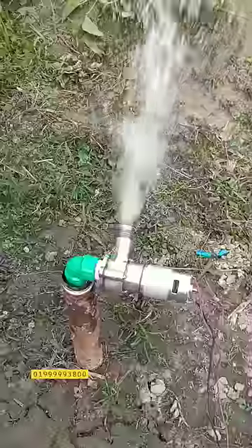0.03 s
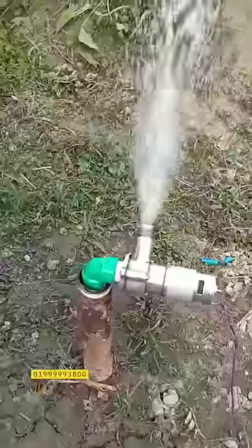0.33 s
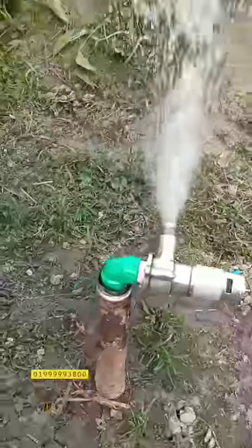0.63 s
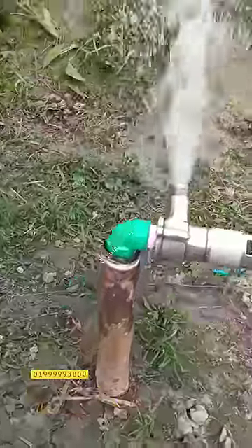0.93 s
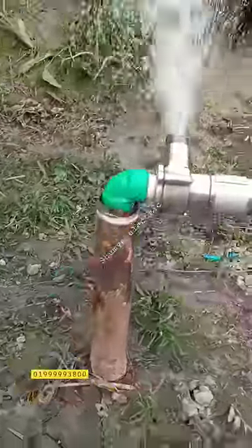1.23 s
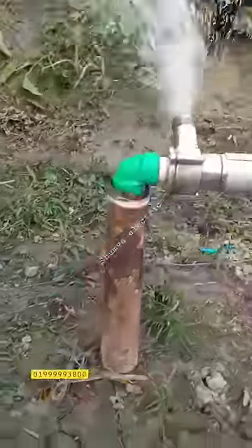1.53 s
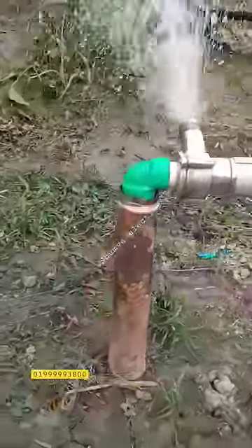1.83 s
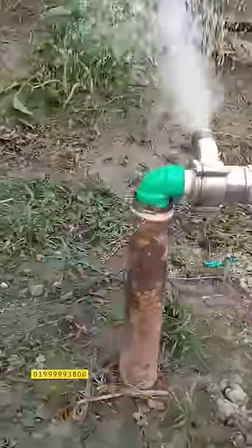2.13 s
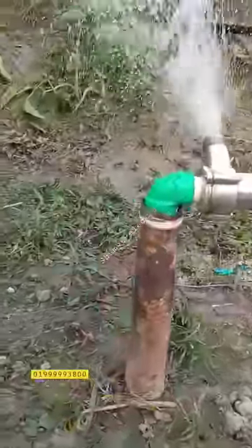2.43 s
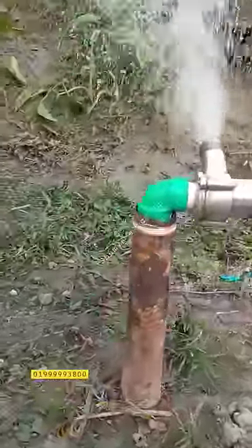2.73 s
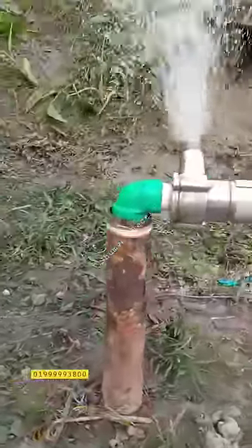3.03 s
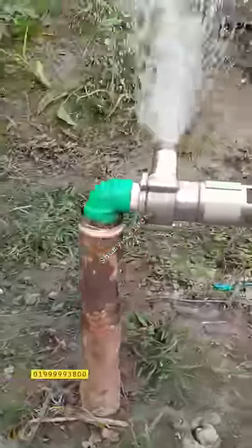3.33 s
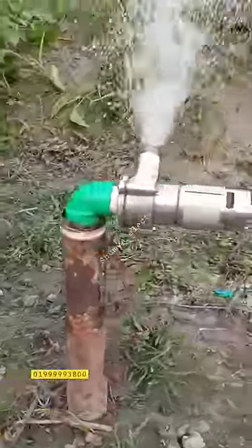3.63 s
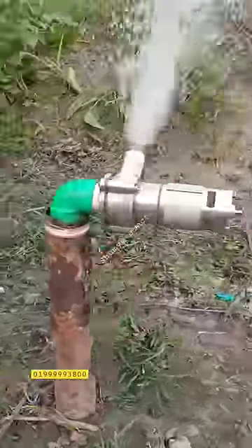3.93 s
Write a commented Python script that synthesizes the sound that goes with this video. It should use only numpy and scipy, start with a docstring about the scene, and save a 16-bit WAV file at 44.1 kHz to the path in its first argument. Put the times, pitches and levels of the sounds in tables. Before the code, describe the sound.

A jet of water hisses from a pipe, surging and spitting drops over a low watery rush. An electric pump hums throughout with a wavering pitch and a thin buzz, about a metre away on open ground.

```python
"""Water pump and jet

A pump runs on open ground and drives a jet out of a pipe stub, about a metre from the microphone.
The motor hums in sharp pulses whose pitch wavers quickly, with a thin steady buzz on top. The jet
hisses, surges and spits as it tears into drops, over a low rush of water. A watery warble, like
compressed audio, lies over the hiss. The sound fades in, and a puff of wind hits the left side."""
import sys
import numpy as np
from scipy import signal
from scipy.fft import rfft, irfft
from scipy.io import wavfile
from scipy.ndimage import uniform_filter1d, map_coordinates

SR = 44100
rng = np.random.default_rng(int(sys.argv[2]) if len(sys.argv) > 2 else 0)


def pcm_store(signal):
    """Save signal as 16-bit PCM."""
    levels = np.round(np.clip(np.atleast_2d(signal), -1, 1) * 32767)
    wavfile.write(sys.argv[1], SR, levels.astype(np.int16).T)


N = 176400
T = np.arange(N) / SR
FREQS = np.maximum(np.arange(N // 2 + 1) * SR / N, 1)

# how fast the motor pulses: t/s, rate/Hz
MOTOR_SPEED = [(.9, 141.9), (3.2, 141.65), (3.9, 141.45)]


def undb(db):
    """Turn decibels into a factor to multiply by."""
    return 10 ** (np.asarray(db) / 20)


def unit(x):
    """Scale a signal to an average size (rms) of 1."""
    return x / np.sqrt(np.mean(x ** 2))


def curve(rows):
    """Join the rows of a timed table with straight lines."""
    times, *columns = np.array(rows, float).T
    return np.squeeze([np.interp(T, times, column) for column in columns])


def response(points):
    """Draw a gain for every frequency through (f/Hz, level/dB) points."""
    hz, db = np.array(points, float).T
    return undb(np.interp(np.log(FREQS), np.log(hz), db))


def shape(x, gain):
    """Turn each frequency up or down by its gain."""
    return irfft(rfft(x) * gain, N)


def noise():
    """White noise, unrelated left and right."""
    return rng.standard_normal((2, N))


def wander(rate_hz):
    """A smooth random wobble of size 1; a higher rate makes it quicker."""
    times = T[::40]
    hz = np.arange(len(times) // 2 + 1) * SR / N
    spectrum = rfft(rng.standard_normal(len(times))) / np.sqrt(1 + (2 * hz / rate_hz) ** 4)
    return np.interp(T, times, unit(irfft(spectrum, len(times))))


def spread(pair, likeness):
    """Blend two noises into left and right: likeness 1 is the same, 0 unrelated, -1 opposite."""
    mid = shape(pair[0], np.sqrt((1 + likeness) / 2))
    side = shape(pair[1], np.sqrt((1 - likeness) / 2))
    return np.array([mid + side, mid - side])


def add(out, sound, at):
    """Mix in a short sound with its middle at the given second."""
    index = int(at * SR) - sound.shape[1] // 2 + np.arange(sound.shape[1])
    inside = (index >= 0) & (index < N)
    out[:, index[inside]] += sound[:, inside]


def motor_hum(cycles, waver_hz=15.6, right_lag_s=0.00012):
    """Harmonics (tones at multiples of the motor rate) line up into one sharp pulse per cycle."""
    # how far the pitch wavers: t/s, swing/Hz
    swing = [(.55, 4), (1.05, 0.58), (1.4, 2.7), (2.1, 4.5), (2.7, 1.7), (3.25, 4.6), (3.9, 6.4)]
    # the main tones: t/s, then relative level/dB of harmonics 1, 3, 4, 5, 6
    main_levels = [(.5, -45, -45.5, -40, -59, -50), (1.1, -41, -40.5, -37.5, -41.5, -51.5),
                   (1.45, -37, -42.5, -39.5, -35, -43.5), (2.05, -40.5, -38.5, -41, -41.5, -38.5),
                   (2.7, -39.5, -36, -37.5, -39, -37), (3.3, -38.5, -39, -36.5, -41.5, -38.5),
                   (3.9, -37, -40, -36, -44.5, -38)]
    # weak tones that follow harmonic 1: harmonic, level/dB relative to it
    weak_tones = [(2, -10), (7, -10.5), (8, -17.5), (9, -14), (10, -14.5)]
    waver = curve(swing) * np.sin(2 * np.pi * np.cumsum(waver_hz + 0.48 * wander(1.3)) / SR)
    lag = np.array([[0], [right_lag_s]]) * curve(MOTOR_SPEED)
    phase = cycles + np.cumsum(waver) / SR - lag
    levels = curve(main_levels)
    tones = list(zip((1, 3, 4, 5, 6), levels))
    tones += [(harmonic, levels[0] + db) for harmonic, db in weak_tones]
    pan_db = np.array([[-0.18], [0.18]])  # higher tones lean further right
    hum = sum(undb(db + harmonic * pan_db) * np.cos(2 * np.pi * harmonic * phase)
              for harmonic, db in tones)
    return np.sqrt(2) * hum * undb(-2 + wander(80))


def casing_buzz(cycles, flutter_db=2.5):
    """The casing buzzes at high multiples of the motor rate, each fluttering on its own."""
    # tones of the casing: harmonic, relative level/dB
    tones = [(9, -8), (10, -8), (20, -5), (23, -2), (25, 2), (28, -2), (29, -4), (30, 3), (39, -1),
             (41, 3.5), (42, -1)]
    buzz = 0
    for harmonic, db in tones:
        gain = undb(db + flutter_db * wander(11))
        buzz = buzz + gain * np.cos(2 * np.pi * (harmonic * cycles + rng.random((2, 1))))
    return buzz * undb(-45.5)


def motor_rasp(cycles, centre_hz=1910, width_octaves=0.82, sharpness=3.5):
    """A short scrape of noise comes once in every motor cycle."""
    octaves = np.log2(FREQS / centre_hz)
    scrape = shape(noise(), 1 / np.sqrt(1 + (octaves / width_octaves) ** 4))
    pulses = np.exp(sharpness * np.cos(2 * np.pi * cycles))
    return unit(scrape * pulses) * undb(-46)


def jet(drops_per_s=5000, drop_share=0.11, surge_db=1.11):
    """The jet hisses and tears into tiny ticking drops; the whole spray surges."""
    # tone colour of the hiss: f/Hz, relative level/dB
    colour = [(650, -34), (1350, -9.5), (1750, -9), (3110, -5.5), (3700, 0), (4740, -3), (5720, 1.5),
              (7140, -8), (8160, -16), (11000, -17), (14000, -19), (15500, -23)]
    # how alike the jet is left and right: f/Hz, likeness
    alike = [(1600, 0.12), (2500, -.21), (3500, 0.4), (5000, -.25), (6500, .2), (11000, -0.12)]
    ticks = (rng.random((2, N)) < drops_per_s / SR) * np.sign(noise())
    drops = ticks * undb(2 * np.minimum(rng.exponential(size=(2, N)), 5))
    spray = np.sqrt(1 - drop_share) * noise() + np.sqrt(drop_share) * unit(drops)
    spray = spread(spray, np.interp(FREQS, *np.array(alike).T))
    bass_cut = 1 / np.sqrt(1 + (1100 / FREQS) ** 8)
    spray = compression_warble(shape(spray, response(colour) * bass_cut))
    pan = undb([[-0.025], [0.025]])
    return pan * unit(spray) * undb(-28.5 + surge_db * wander(24))


def compression_warble(hiss, rate_hz=45):
    """A watery warble, like compressed audio, is laid over the hiss as bands flicker at random."""
    frames = dict(fs=SR, nperseg=512, noverlap=384)
    hz, times, cells = signal.stft(hiss, **frames)  # a grid of frequency by time
    db = 0
    for depth_db, width_hz in ((0.46, 1486), (4.5, 170)):  # wide bands gently, narrow ones strongly
        wobble = rng.standard_normal(cells.shape[1:])
        wobble = uniform_filter1d(wobble, round(width_hz / hz[1]), axis=0)
        wobble = uniform_filter1d(wobble, round(1 / rate_hz / times[1]), axis=1)
        db = db + depth_db * np.minimum(unit(wobble), 1.3)
    return signal.istft(cells * undb(db), **frames)[1][:, :N]


def echoes(spray, sway_hz=1.17):
    """Echoes off pipe and ground drift as the microphone sways, slowly recolouring the spray."""
    # the echoes: delay/s, typical drift/s, level/dB relative to the direct sound
    bounces = [(.0014, 0.000088, -12.5), (.0052, .00012, -2.5)]
    out, power = spray, 1
    for delay, drift, db in bounces:
        late = [map_coordinates(side, [(T - delay - drift * wander(sway_hz)) * SR], mode="mirror")
                for side in spray]
        out = out + undb(db) * np.array(late)
        power += undb(db) ** 2
    return out / np.sqrt(power)


def water_rush(wide_above_hz=1020, churn_db=2.5):
    """Water churns in the pipe and lands; its bass is alike on both sides."""
    # tone colour of the rush: f/Hz, relative level/dB
    colour = [(70, -5.5), (120, -4.5), (200, -1), (350, -0.5), (700, 0.5), (1100, 3), (1600, -5),
              (2500, -27.5)]
    water = spread(noise(), 1 / (1 + (FREQS / wide_above_hz) ** 4))
    return unit(shape(water, response(colour))) * undb(-41 + churn_db * wander(29))


def splash(hz, spread_s, bubbles=12, spread_octaves=0.2354, decay_cycles=19.6):
    """A cluster of bubbles rings briefly around one pitch; its loudest moment has size 1."""
    t = np.arange(-2048, 2048) / SR
    pitch, when = np.clip(rng.standard_normal((2, bubbles, 1, 1)), -2, 2)
    cycles = np.maximum(t - spread_s * when, 0) * hz * 2 ** (spread_octaves * pitch)
    envelope = (1 - np.exp(-cycles)) * np.exp(-cycles / decay_cycles)
    rings = envelope * np.sin(2 * np.pi * (cycles + rng.random((bubbles, 2, 1))))
    cluster = rings.sum(axis=0)
    power = uniform_filter1d(np.mean(cluster ** 2, axis=0), size=130)
    return cluster / np.sqrt(power.max())


def spits(small_count=300):
    """Pockets of air burst from the nozzle: a few loud splashes over a constant sputter."""
    # the single spits: t/s, relative level/dB, centre f/Hz, spread in time/s
    bursts = [(0.428, -20, 4090, 0.0061), (0.668, -24, 4290, 0.0062), (.727, -26, 5200, .006),
              (.812, -24, 4490, 0.0036), (.837, -22, 4400, 0.0021), (1.189, -24.5, 4210, 0.01),
              (1.238, -22, 4210, 0.0052), (1.33, -21, 4190, 0.0031), (1.364, -23, 4500, .001),
              (1.782, -19.5, 4800, 0.0012), (1.796, -24.5, 4500, 0.0027), (2.187, -32, 3250, 0.00103),
              (2.333, -25, 3680, .007), (2.882, -25.5, 4140, 0.0029), (3.3883, -16, 4390, 0.00032),
              (3.39, -24.5, 2920, .001), (3.829, -35, 3970, .001), (3.989, -26, 4660, 0.0066)]
    out = np.zeros((2, N))
    for at, db, hz, spread_s in bursts:
        add(out, splash(hz, spread_s) * undb(db - 0.5), at)
    scatter = np.clip(rng.standard_normal((small_count, 2)), -2, 2)
    times = rng.random(small_count) * N / SR
    for at, (pitch, size) in zip(times, scatter):
        small = splash(hz=4710 * 2 ** (0.216 * pitch), spread_s=0.002, bubbles=3)
        add(out, small * undb(-33 + 2 * size), at)
    return out


def wind(puff_at_s=0.5866, puff_hz=26.6, rise_s=0.00033, decay_s=0.015, tick_hz=2100, gust_db=7):
    """One puff ticks and rocks the microphone's left membrane, amid faint buffeting."""
    # tone colour of the buffeting: f/Hz, relative level/dB
    colour = [(15, 10), (35, -22), (70, -5), (150, -47), (400, -46)]
    # strength of the buffeting before gusts are added: t/s, level/dB
    strength = [(.5, -72), (.66, -48), (.9, -59), (1.3, -72), (3.2, -79), (3.9, -56)]
    rumble = unit(shape(noise(), response(colour)))
    left, right = rumble * undb(curve(strength) + gust_db * wander(17))
    age = np.maximum(T - puff_at_s, 0)
    envelope = (1 - np.exp(-(age / rise_s) ** 2)) * np.exp(-age / decay_s)
    puff = -0.4 * envelope * np.cos(2 * np.pi * puff_hz * age)
    tick = 2 * undb(-24) * np.exp(-age / 0.001) * np.sin(2 * np.pi * tick_hz * age)
    return np.array([left + puff + tick, right * undb(-27)])


def scene():
    """Motor, water and wind in the open air."""
    cycles = np.cumsum(curve(MOTOR_SPEED)) / SR  # motor pulses counted so far
    motor = motor_hum(cycles) + casing_buzz(cycles) + motor_rasp(cycles)
    return motor + echoes(jet()) + spits() + water_rush() + wind()


def record(dry, start_s=0.221, top_hz=15600):
    """The microphone dulls three narrow bands; the sound fades in, with its highest treble cut off."""
    # the microphone's dips: f/Hz, width/Hz, level/dB
    dips = [(6700, 60, -5), (7350, 65, -7.5), (8070, 82, -17)]
    # the fade-in after a short silence: t/s, level/dB
    fade_in = [(.222, -13.5), (.26, -10.5), (.3, -7), (.36, -3), (.41, 0)]
    dips_db = sum(db * np.exp(-((FREQS - hz) / width) ** 2) for hz, width, db in dips)
    faded = shape(dry, undb(dips_db)) * undb(curve(fade_in)) * (T > start_s)
    treble_cut = signal.ellip(16, 0.2, 100, top_hz, fs=SR, output="sos")
    return signal.sosfilt(treble_cut, faded)


dry = scene()
out = record(dry)
pcm_store(out)
```